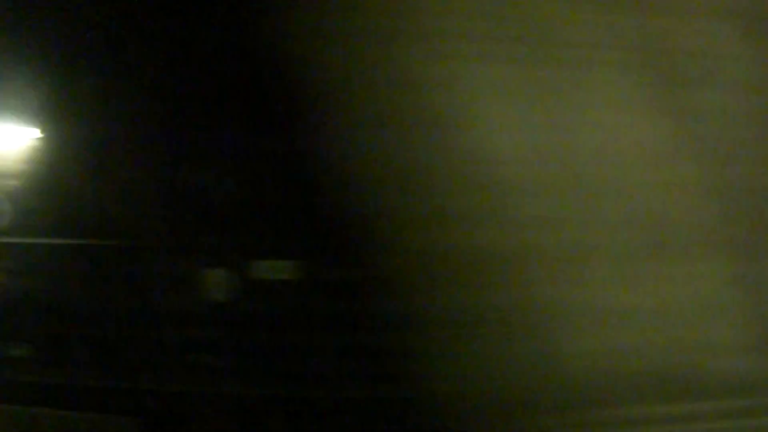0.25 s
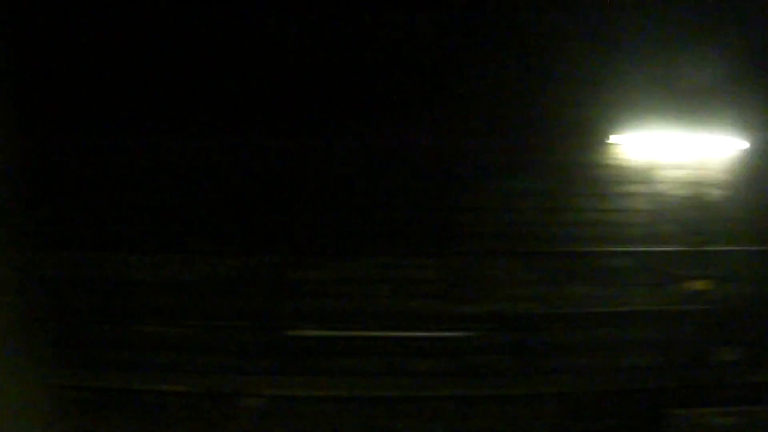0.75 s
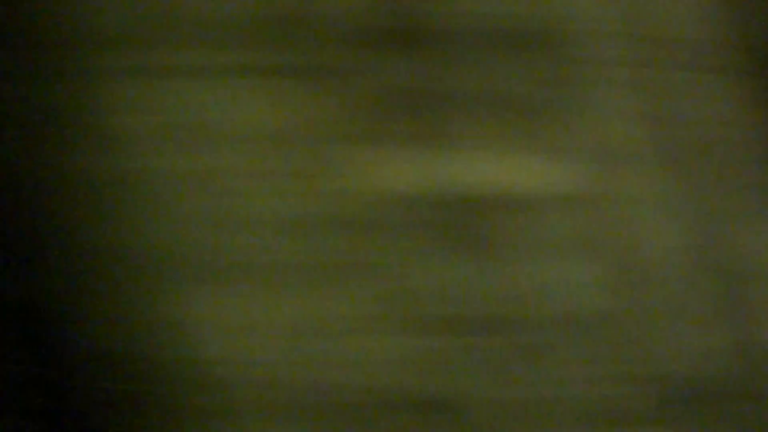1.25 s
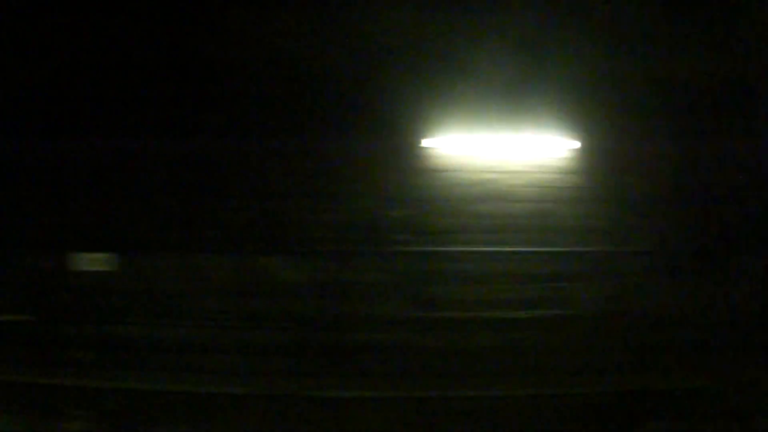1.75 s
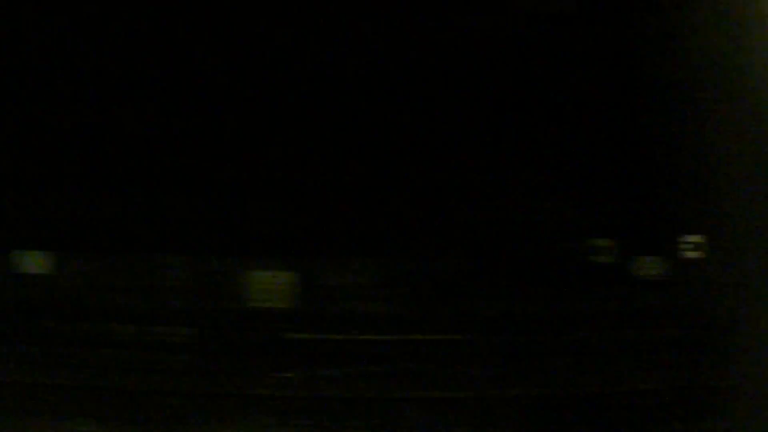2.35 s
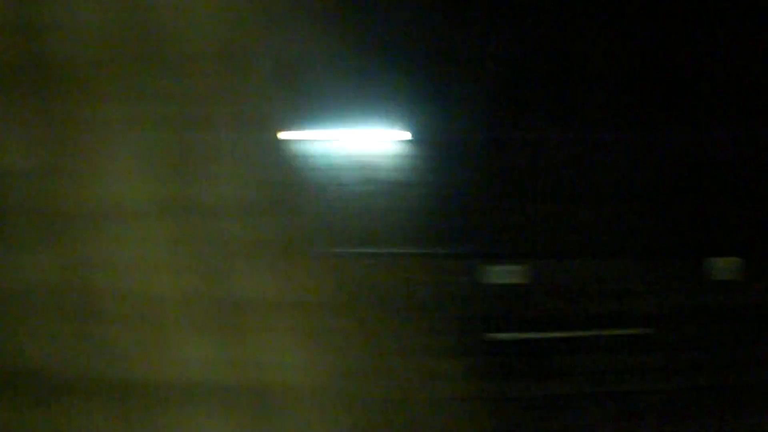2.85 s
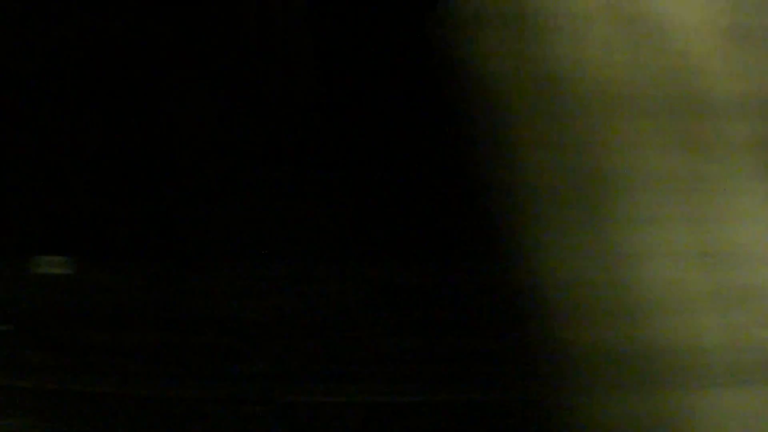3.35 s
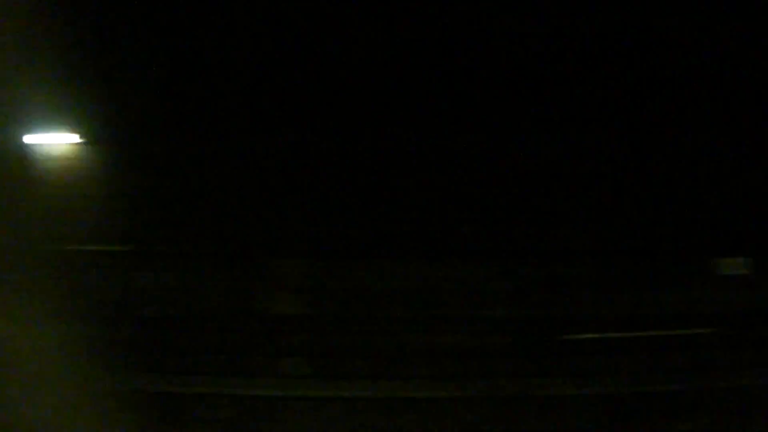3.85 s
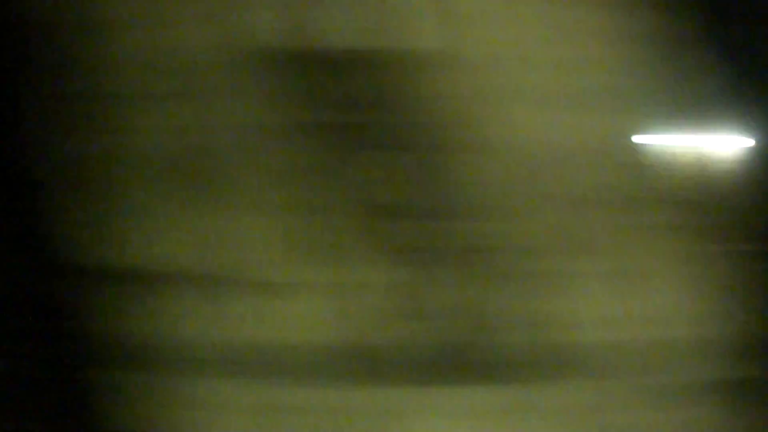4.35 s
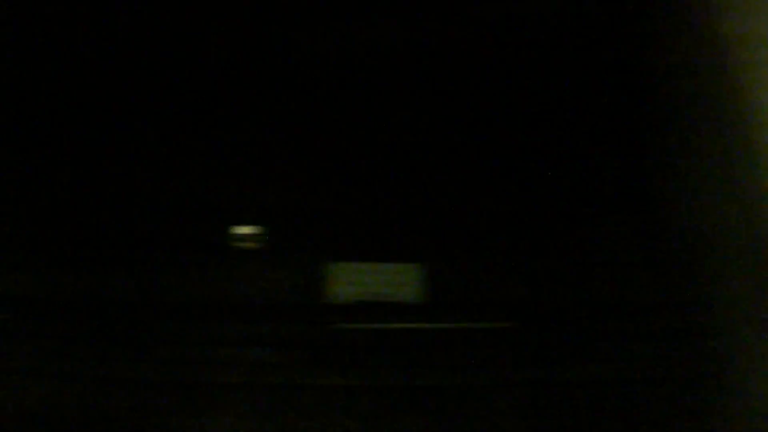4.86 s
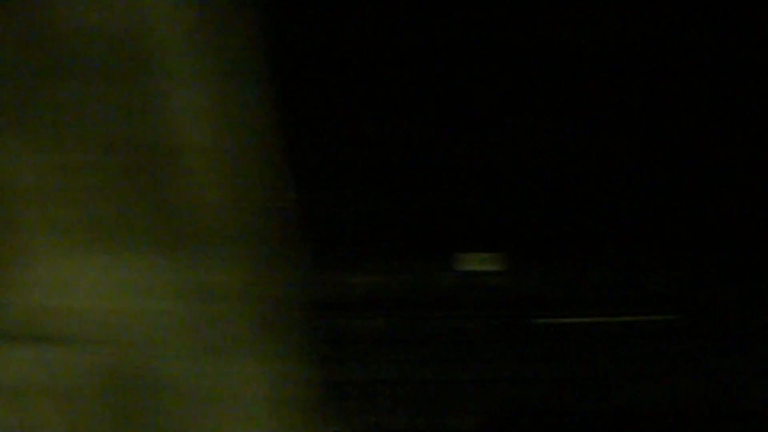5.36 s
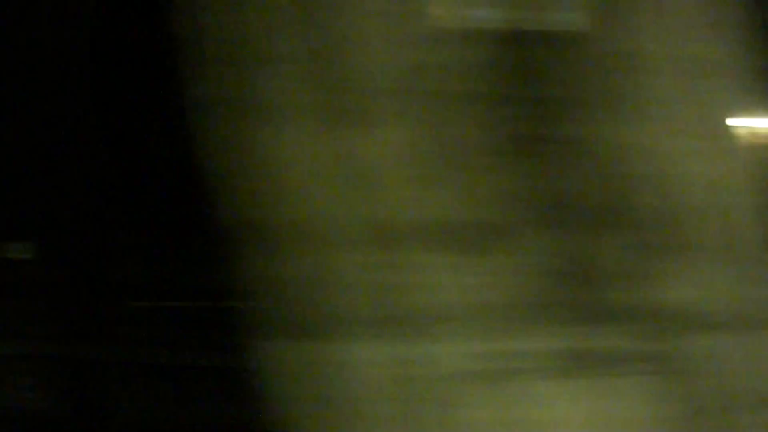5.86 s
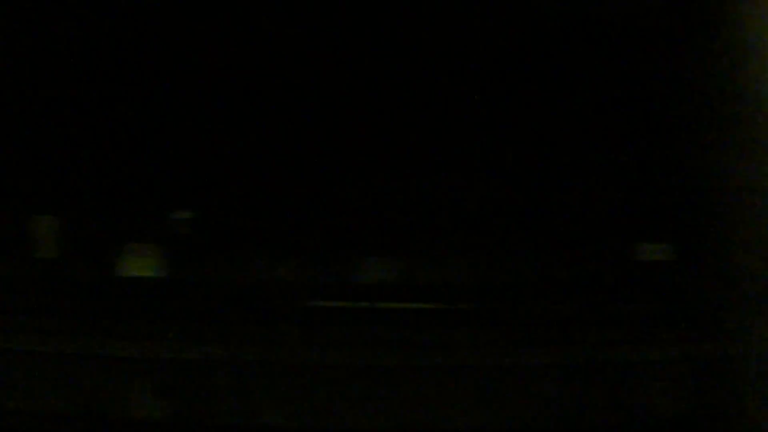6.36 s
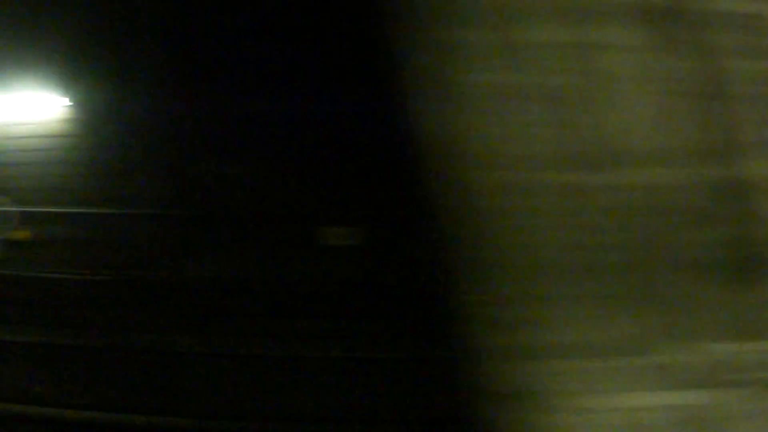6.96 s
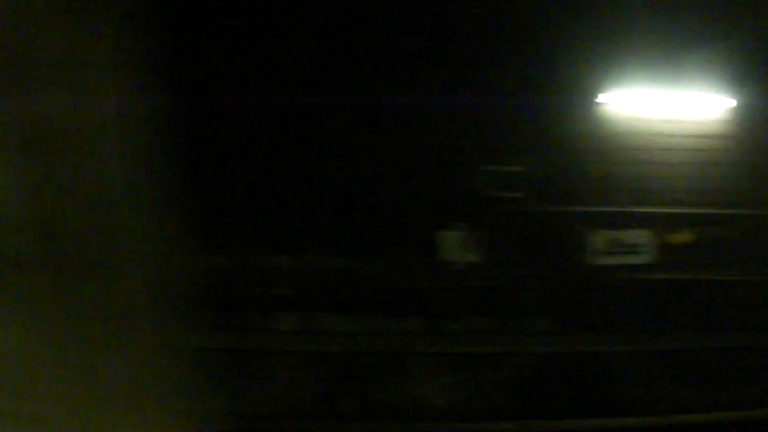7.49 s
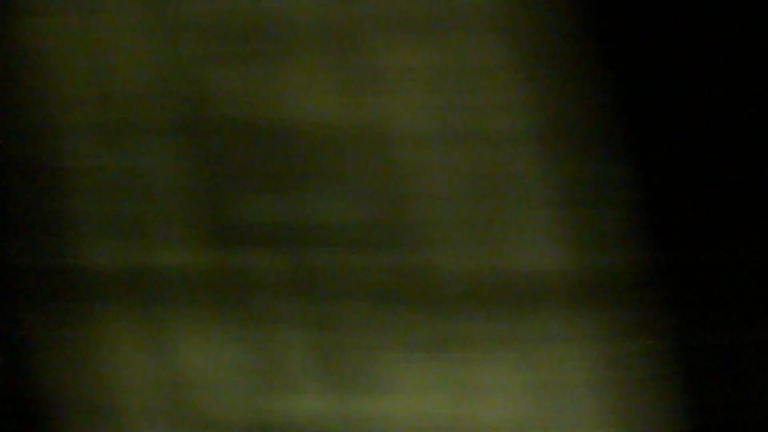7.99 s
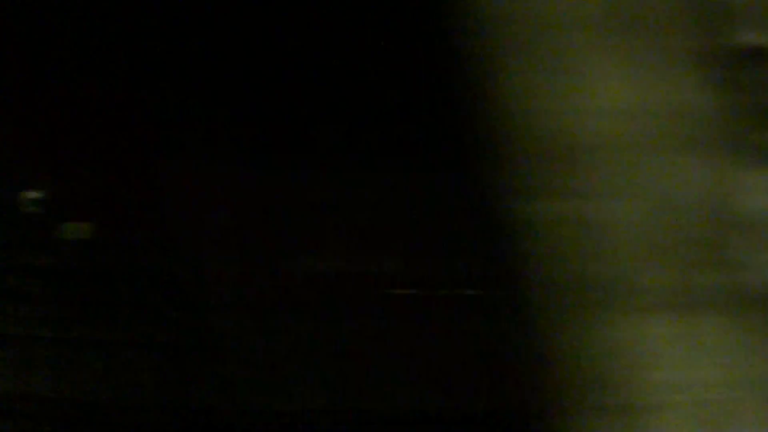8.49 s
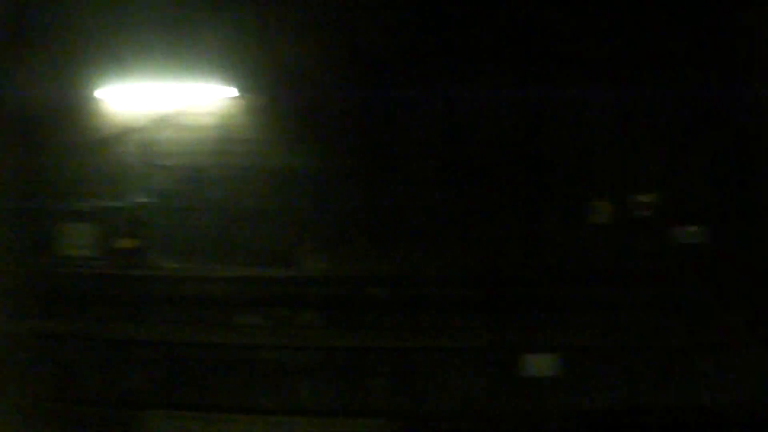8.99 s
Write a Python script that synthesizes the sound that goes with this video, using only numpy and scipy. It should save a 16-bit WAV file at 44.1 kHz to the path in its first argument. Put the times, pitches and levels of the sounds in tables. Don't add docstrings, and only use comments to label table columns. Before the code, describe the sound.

Inside a subway car speeding through a tunnel, a low wavering floor hum and heavy wheel rumble, rail roar through glass, growing air hiss.

```python
import sys
import numpy as np
from scipy import signal
from scipy.io import wavfile
from scipy.ndimage import uniform_filter1d

SR = 44100
rng = np.random.default_rng(int(sys.argv[2]) if len(sys.argv) > 2 else 0)


def to_linear_factor(level_db):
    exponent = np.asarray(level_db, float) / 20
    return 10 ** exponent


def bounce(signal):
    frames = np.transpose(np.atleast_2d(signal))
    limited = np.clip(frames, -1, 1)
    pcm = np.round(limited * 32767).astype(np.int16)
    wavfile.write(sys.argv[1], SR, pcm)


N = 407043

# t/s, wall closeness/dB, rail sharpness/(dB per octave), floor level/dB
RUN = [(0, 1.5, -2, -19.5), (.6, -1, -2, -20.5), (1.4, 0, -1.5, -19), (2.3, 0, -1.5, -18.5),
       (3.2, 0.5, -1.1, -20), (4.2, 2, 0, -19), (4.8, 2.5, 2, -23.5), (5.6, 2, 3.5, -23),
       (6.4, 2.5, 3, -21.5), (7.2, 4, 4.5, -24), (8.2, 3.5, 4.5, -30.5), (8.55, 7, 1.5, -25.5),
       (9.0, 8, 3.5, -27), (9.23, 8, 2.5, -32.5)]
# t/s, level/dB, length/s
SWELLS = [(.65, 2, 0.19), (1.17, 5.5, .08), (2.71, 4, .1), (3.32, 3.5, 0.071), (3.73, 0.5, 0.063),
          (4.38, 2.5, 0.093), (4.54, 6.5, 0.045), (4.93, 4.5, 0.14), (5.15, 2, .08), (5.53, 2, 0.23),
          (6.87, 2, 0.11), (7.06, 6, 0.088), (7.21, 6.5, 0.055), (7.52, 8, .1), (8.36, 1, 0.064),
          (8.55, 13.5, 0.045), (8.71, 8.5, 0.065)]


def hum(t):
    level_db = columns(RUN, t)[2] - 1.2 + bumps(SWELLS, t)
    floor_hz = 190.1 - 0.6 * t + 4.016 * drift(0.08)
    shaken = resonate(rng.standard_normal(N), 1.056 * floor_hz, 45, 45)
    waver_hz = 5 * evened(uniform_filter1d(rng.standard_normal(N), size=2500))
    locked = np.sin(2 * np.pi * np.cumsum(0.985 * floor_hz + waver_hz) / SR)
    tone = to_linear_factor(level_db - 1.87) * evened(shaken + 0.93 * evened(locked))
    tone = signal.sosfilt(signal.butter(4, 135, "high", fs=SR, output="sos"), tone)
    bogie_db = -73 + 1.3 * t + 8 * np.clip(t - 8.4, 0, 1)
    return tone + to_linear_factor(bogie_db) * resonate(rng.standard_normal(N), 73, 14, 18, 22)


# f/Hz, level/(dB per Hz)
BODY_EARLY = [(24, -96.5), (40, -75), (97, -61.5), (145, -49.5), (165, -28), (186, 8.5), (226, -5.5),
              (264, -18.5), (440, -4), (485, -13), (668, -12), (857, -35.5), (1100, -30), (1430, -56),
              (2420, -120)]
# f/Hz, level/(dB per Hz)
BODY_LATE = [(24, -75), (40, -60), (125, -20), (145, -13), (176, 1.5), (233, -7.5), (303, 0), (378, -3),
             (492, -2.5), (542, -8), (589, -4), (649, -12), (1100, -27), (1430, -46), (2420, -120)]
# t/s, level/dB, length/s
JOLTS = [(.02, 2.5, 0.37), (.31, 4, .05), (.49, 4, .06), (1.07, 1.5, 0.13), (1.43, 2, 0.1), (2.12, 2.5, .1),
         (2.36, 1.5, 0.042), (2.66, 3.5, 0.091), (2.88, 1.5, .12), (3.46, 4.5, 0.019), (3.52, 2.5, 0.028),
         (3.7, 3, 0.079), (4.52, 1, 0.086), (5.3, 1.5, 0.12), (6.14, 1, .15), (7.8, 0.5, .3),
         (8.58, 3, .06), (8.9, -2, 0.22), (9.07, 5, .05)]


def rumble(t, near_db, gust_db):
    fill_db = 2.82 * np.clip((t - 2.1) / 3.8, 0, 1)
    level_db = level(np.minimum(near_db, 2.5), gust_db, zero_db=-20.5, near_share=0.55, gust_share=0.07)
    level_db = level_db + fill_db + bumps(JOLTS, t)
    boom_hz = 416.3 + 24 * drift(0.25)
    boom_db = -12 - 1.1 * t + 1.5 * drift(0.11)

    def body_db(hz, s):
        late = np.clip((s - 1.5) / 4.8, 0, 1)
        hollow = -7 * np.exp(-((hz - 188) / 24) ** 2)
        full = (1 - late) * read(BODY_EARLY, hz) + late * read(BODY_LATE, hz) + hollow
        return full - 10 * np.log10((to_linear_factor(2 * full) * (hz > 230)).sum(0))

    broad = noise(body_db, size=2048, patchy_db=0.53, flicker_db=0.37)
    boom = resonate(broad, boom_hz, 130, 200)
    return to_linear_factor(level_db - 0.62) * (broad + to_linear_factor(boom_db) * boom)


# f/Hz, level/(dB per Hz)
GLASS = [(410, -39), (700, -1), (731, 6.5), (858, -3), (1060, -7.5), (1570, -6), (1830, -9.5), (2170, -11),
         (2700, -17.5), (3050, -36), (3960, -64.5), (6710, -120)]
# f/Hz, width/Hz, level/dB
RAIL = [
    (1224, 110, -21),
    (1590, 310, -20.5),
    (2158, 220, -15.5),
]


def roar(t, near_db, gust_db):
    level_db = level(near_db, gust_db, zero_db=-34, near_share=0.97, gust_share=0.44)
    level_db = level_db + 0.6 * bumps(JOLTS, t)

    def glass_db(hz, s):
        octaves = np.log2(np.clip(hz, 800, 3000) / 1500)
        return read(GLASS, hz) + columns(RUN, s)[1] * octaves

    broad = noise(glass_db, size=512, patchy_db=0.67, flicker_db=0.3)
    ringing = to_linear_factor(0.56 * (level_db - level_db.mean()))
    modes = sum(to_linear_factor(db) * resonate(broad, hz, width) for hz, width, db in RAIL)
    return to_linear_factor(level_db + 0.17) * (broad + ringing * modes)


# t/s, draught level/dB
DRAUGHT = [(0, 2.5), (.7, -1), (1.6, 0), (2.5, 0), (3.3, 0), (4.2, 0), (4.7, 2.5), (5.6, 2), (6.4, 3),
           (7, 4.5), (7.9, 4.5), (8.4, 7.5), (9.0, 7.5), (9.23, 10)]
# f/Hz, level/(dB per Hz)
SEAL = [(3700, -40), (4000, -12.5), (4350, -5.5), (5000, -8.5), (5600, -3.5), (6800, -2.5), (7800, -4),
        (9400, -12), (10000, -16), (11300, -30.5), (11900, -45.5), (13600, -46), (14000, -33.5),
        (15600, -30.5), (17000, -37.5)]
# t/s, f/Hz, level against the hiss/dB
WHISTLE = [(0, 6760, -12.5), (4.3, 6880, -14), (4.75, 6920, -7), (5.4, 6870, -14.5), (6.0, 6900, -6),
           (6.45, 6800, -14), (6.9, 6940, -6), (7.9, 6750, -15), (8.12, 7120, -9), (8.65, 6970, -7.5),
           (8.82, 6400, -4.5), (9.2, 6760, -9.5)]
# t/s, peak level/dB, length/s
UPPER_SQUEALS = [(4.8, -76, .3), (5.1, -77, .2), (5.95, -74, .3), (6.55, -77, .2), (6.8, -76, 0.27),
                 (7.3, -77, .3), (7.9, -73, .2), (8.45, -73, .3), (9.0, -73, .3)]
# t/s, peak level/dB, length/s
LOWER_SQUEALS = [
    (6.05, -75, .2),
    (7.85, -70, .25),
    (8.25, -67, .25),
    (8.8, -60, .25),
    (9.2, -74, .3),
]
# f/Hz, level/(dB per Hz)
PANE = [(2800, -29.5), (3100, -2.5), (3440, -1.5), (3750, -4), (4100, -15), (4400, -41)]


def hiss(t, gust_db):
    draught_db, = columns(DRAUGHT, t)
    seal_db = level(draught_db, gust_db, zero_db=-62, near_share=1.12, gust_share=0.94)
    pane_db = level(draught_db, gust_db, zero_db=-72.5, near_share=1.3, gust_share=1.1)
    whistle_hz, whistle_db = columns(WHISTLE, t)
    upper_gain = bumps([(s, to_linear_factor(db), length) for s, db, length in UPPER_SQUEALS], t)
    lower_gain = bumps([(s, to_linear_factor(db), length) for s, db, length in LOWER_SQUEALS], t)

    air = noise(lambda hz, s: read(SEAL, hz) + 0 * s, size=256, patchy_db=0.9, flicker_db=-0.3)
    whistle = to_linear_factor(whistle_db) * resonate(air, whistle_hz, 680, 900)
    stutter_db = 4.5 * evened(uniform_filter1d(rng.standard_normal(N), size=3000))
    upper_hz = 9420 + 0.3 * (whistle_hz - 6850)
    upper = upper_gain * to_linear_factor(stutter_db) * resonate(air, upper_hz, 380, 500)
    lower = lower_gain * resonate(air[0], 5600, 160, 250)

    pane = noise(lambda hz, s: read(PANE, hz) + 0 * s, size=256, patchy_db=1, flicker_db=0.5)
    sing = to_linear_factor(0.91 * (pane_db + 53)) * resonate(pane[1], 3440, 200)
    return to_linear_factor(seal_db + 1.5) * (air + whistle) + upper + lower + to_linear_factor(pane_db + 3) * (pane + sing)


# t/s, peak level/dB, f/Hz, left minus right/dB
TICKS = [
    (3.928, -56, 9180, 9),
    (4.4221, -51.5, 9240, 7.5),
    (4.953, -44, 9100, -8.5),
    (5.6989, -56.5, 9490, -3),
    (5.938, -48, 8950, 3),
    (8.767, -45.5, 8760, 8.5),
    (9.1293, -39.5, 8970, -4),
]


def trim():
    out, u = np.zeros((2, N)), np.arange(900) / SR
    modes = [(1, 1, 0.011), (0.9, 0.69, 0.011), (0.5, 1.13, 0.006), (0.7, 0.8, 0.011)]  # gain, ratio, T60/s
    for s, db, hz, pan_db in TICKS:
        ring = sum(gain * np.sin(2 * np.pi * ratio * hz * u) * to_linear_factor(-60 * u / t60)
                   for gain, ratio, t60 in modes)
        ring = ring * (1 - np.exp(-u / 0.0005))
        at = round((s + 0.0003) * SR)
        sides_db = pan_db * np.array([[0.5], [-0.5]])
        out[:, at:at + len(u)] += to_linear_factor(db + 3.5 + sides_db) * ring
    return out


# f/Hz, left-right likeness
SAME = [(60, 0.99), (180, 1), (300, .99), (520, 0.99), (890, 0.93), (1520, .82), (2600, 0.78), (4500, 0.59),
        (8000, .2), (14000, .6)]
# f/Hz, left minus right/dB
LEAN = [(60, 0), (210, 0.5), (500, -1), (1100, 1.9), (2300, -1.4), (4500, -0.5), (8000, 1)]


def noise(shape_db, size, patchy_db, flicker_db):
    hop = size // 4
    frames, hz = N // hop + 5, np.fft.rfftfreq(size, 1 / SR)[:, None]
    a, b, c, d, patches = rng.standard_normal((frames, len(hz), 5), dtype=np.float32).T
    patches = evened(uniform_filter1d(uniform_filter1d(patches, size=9, axis=0), size=9, axis=1))
    flicker = evened(uniform_filter1d(rng.standard_normal(frames), size=5))
    same, left = np.clip(read(SAME, hz), -1, 1), a + 1j * b
    right = same * left + np.sqrt(1 - same ** 2) * (c + 1j * d)
    z = np.array([left * to_linear_factor(read(LEAN, hz)), right])
    t = (np.arange(frames) - 2) * hop / SR
    z *= to_linear_factor(shape_db(hz, t) + patchy_db * patches + flicker_db * flicker)
    x = signal.istft(z, nperseg=size, noverlap=size - hop, boundary=False)[1]
    return evened(x[:, size // 2:][:, :N])


def resonate(x, hz, *widths):
    turn = np.exp(2j * np.pi * np.cumsum(hz * np.ones(N)) / SR)
    low = x * turn.conj()
    for r in np.exp(-np.pi * np.array(widths) / SR):
        low = signal.lfilter([1 - r], [1, -r], low)
    return evened((turn * low).real)


def evened(x):
    return x / np.sqrt(np.mean(x ** 2) + 1e-20)


def read(points, hz):
    f, value = np.transpose(points)
    return np.interp(np.log(hz + 1), np.log(f + 1), value)


def columns(rows, t):
    s, *values = np.transpose(rows)
    return [np.interp(t, s, v) for v in values]


def bumps(rows, t):
    s, height, length = np.transpose(rows)[:, :, None]
    coarse = t[::64]
    return np.interp(t, coarse, (height * np.exp(-((coarse - s) / (length / 2)) ** 2)).sum(0))


def drift(seconds):
    knots = rng.standard_normal(400)
    return evened(np.interp(np.arange(N) / SR / seconds, np.arange(len(knots)), knots))


def level(near_db, gust_db, zero_db, near_share, gust_share):
    return zero_db + near_share * near_db + gust_share * gust_db


# t/s, level/dB, length/s
GUSTS = [(.05, -1.5, .1), (.3, -0.5, .08), (1.07, 7, 0.12), (2.03, 3.5, .12), (2.55, 3.5, .1),
         (2.7, 0.5, .06), (2.91, 5, 0.12), (3.52, 2.5, .12), (3.7, 2.5, .1), (3.81, 3, .06), (4.5, 2, .1),
         (4.75, 3, 0.13), (4.96, -0.5, 0.043), (5.3, 2, 0.11), (5.77, 2, 0.093), (5.97, 1.5, 0.11),
         (6.12, 3, 0.14), (6.68, 2, .2), (6.9, 2.5, .12), (7.28, 3.5, 0.081), (7.45, 2.5, 0.084),
         (7.67, 3, .14), (7.93, 2, .1), (8.43, 1, 0.1), (8.71, 3.5, 0.04), (8.81, 8.5, 0.13),
         (9.07, 1.5, .05), (9.16, 2.5, 0.06)]


def scene():
    t = np.arange(N) / SR
    near_db, gust_db = columns(RUN, t)[0], bumps(GUSTS, t)
    floor = hum(t) * to_linear_factor(np.array([[-0.1], [0.1]]))
    return floor + rumble(t, near_db, gust_db) + roar(t, near_db, gust_db) + hiss(t, gust_db) + trim()


# t/s, level/dB, spacing/ms, jumps, sign of each against the last
JUMPS = [(0.3013, -24, .18, 1, 1), (0.9096, -53, .18, 1, 1), (1.3168, -51.5, .18, 1, 1),
         (2.702, -35, .3, 2, -1), (2.7072, -30, .19, 5, 1), (2.7128, -34.5, .19, 3, 1),
         (2.7143, -34.5, .66, 6, 1), (2.7188, -33.5, 0.17, 2, 1), (2.7203, -38.5, .66, 5, 1),
         (3.12, -51, .18, 1, 1), (4.1389, -28.5, .18, 2, -1), (7.658, -51, .18, 1, 1),
         (8.5462, -26, .2, 1, 1), (8.5468, -28.5, .27, 3, 1), (8.551, -39.5, 1.1, 4, 1),
         (8.7112, -30, .25, 2, 1)]


def crackle():
    chance, size = rng.random((2, N))
    steps = (chance < 12 / SR) * to_linear_factor(-64 + 10 * size)
    for s, db, ms, jumps, sign in JUMPS:
        k = np.arange(round(jumps))
        at = np.round((s + k * ms / 1000) * SR).astype(int)
        steps[at] += to_linear_factor(db) * np.sign(sign) ** k
    healing = signal.lfilter([1], [1, -0.95], steps)
    return signal.lfilter([1, -1], [1, -0.8], healing)


def band_limit(x):
    return signal.sosfilt(signal.butter(12, 15750, fs=SR, output="sos"), x)


# f/Hz, width/Hz
NOTCHES = [
    (3000, 180),
    (4000, 530),
    (5000, 510),
]


def record(dry):
    x = signal.sosfilt(signal.butter(2, 30, "high", fs=SR, output="sos"), dry)
    for hz, width in NOTCHES:
        x = signal.lfilter(*signal.iirnotch(hz, hz / width, SR), x)
    x *= np.minimum(np.arange(N) / (0.002 * SR), 1)
    return band_limit(x + crackle())


dry = scene()
out = record(dry)
bounce(out)
```